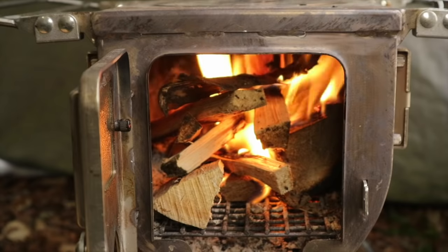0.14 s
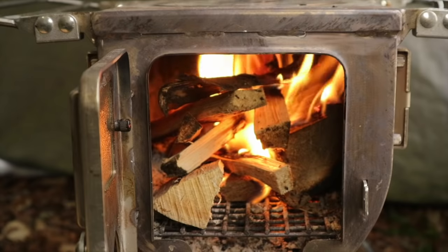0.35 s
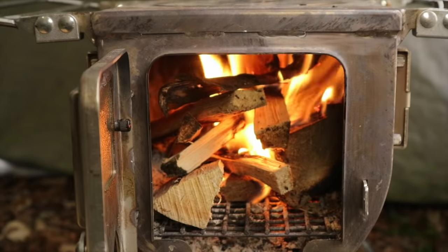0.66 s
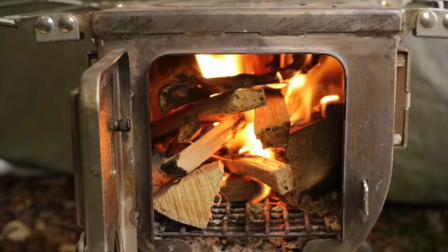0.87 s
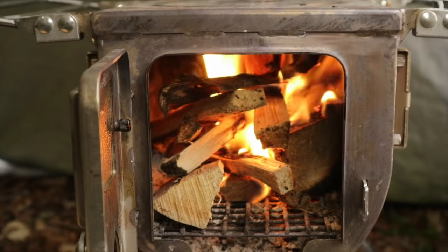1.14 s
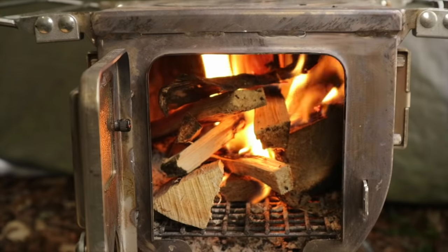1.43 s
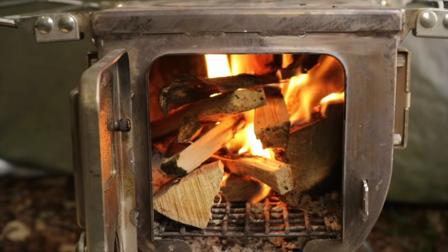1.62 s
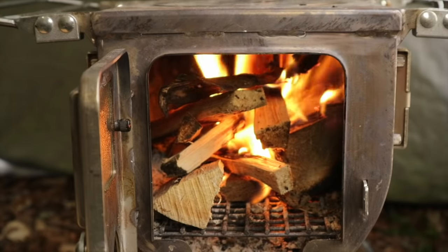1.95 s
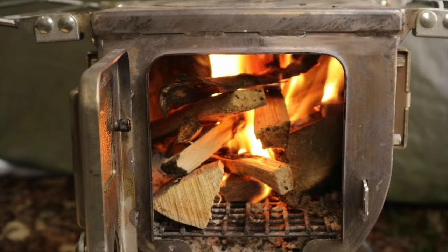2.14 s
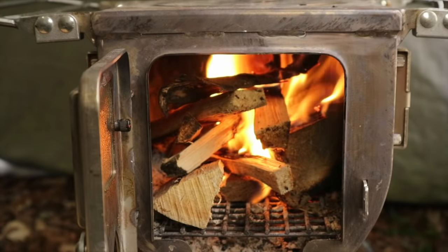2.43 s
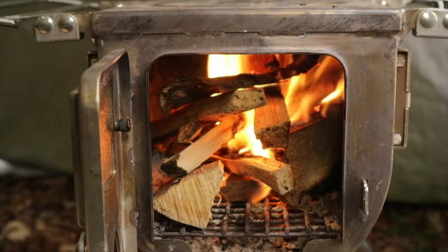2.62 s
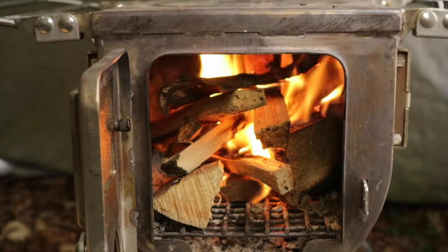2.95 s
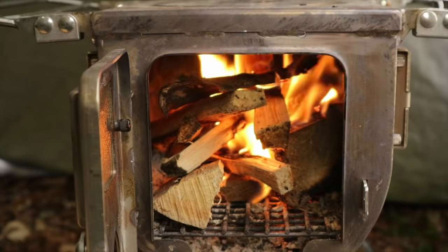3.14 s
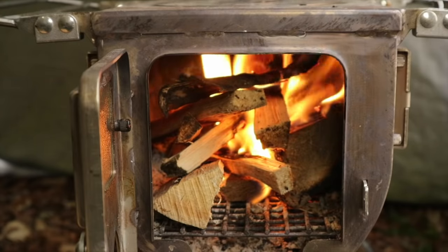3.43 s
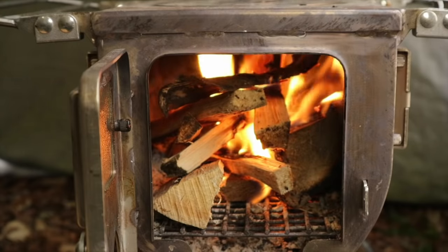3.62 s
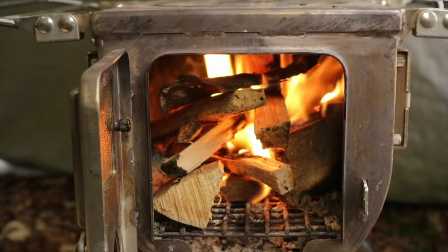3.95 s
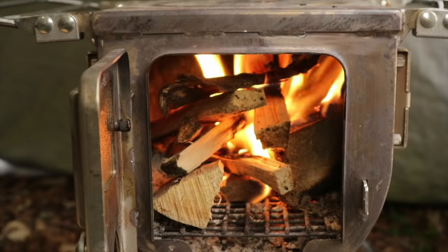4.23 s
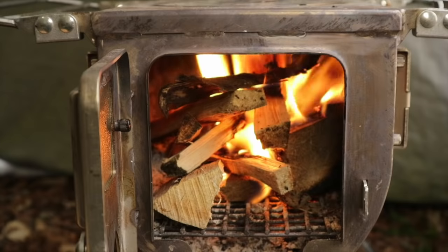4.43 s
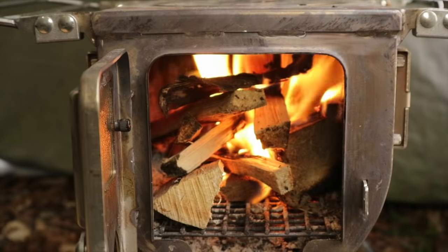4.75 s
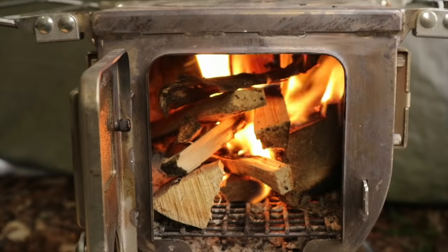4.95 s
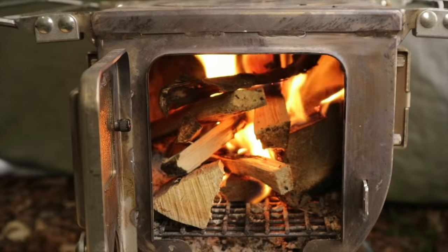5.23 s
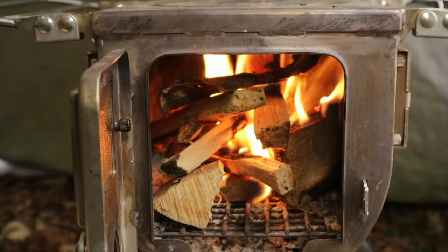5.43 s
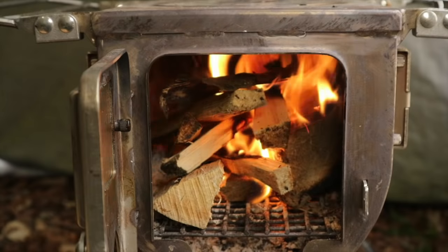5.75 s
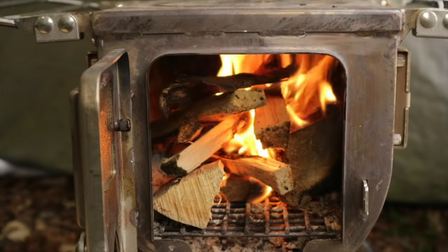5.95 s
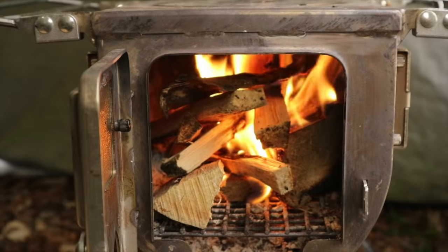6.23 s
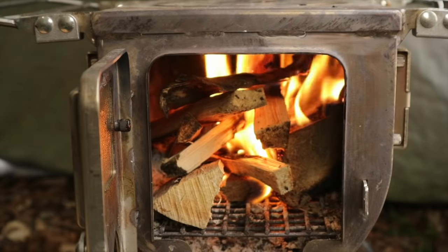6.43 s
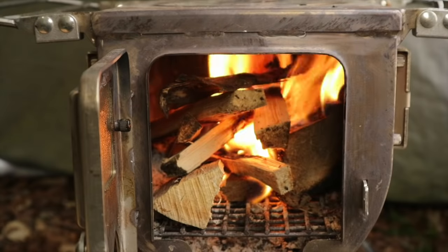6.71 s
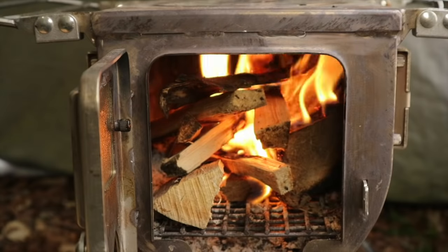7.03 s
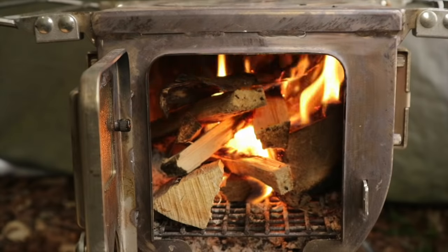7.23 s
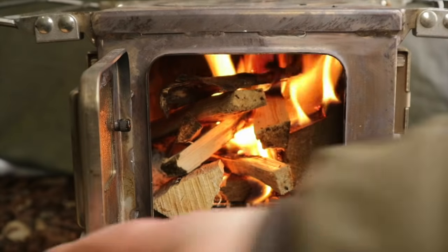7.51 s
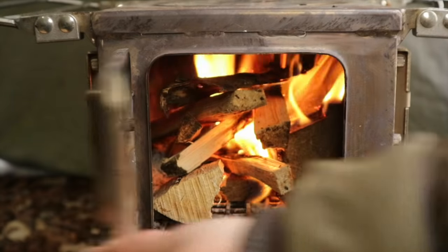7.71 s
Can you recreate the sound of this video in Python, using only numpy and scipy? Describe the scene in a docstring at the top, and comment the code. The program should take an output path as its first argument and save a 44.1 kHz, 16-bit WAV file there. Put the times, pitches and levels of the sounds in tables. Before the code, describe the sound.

Close wood fire in an open steel stove with sharp boxy pops, a shrill bird alarm outside, then cloth rustle and small door knocks.

```python
"""Logs burn in an open steel tent stove: flames rumble, sap fizzes and ticks, and pops excite the firebox modes.
Fire is shaped noise and minimum-phase clicks; birds outside among the trees are frequency-modulated tones.
A small bird calls thinly, and a larger one gives a shrill alarm rattle of breaking whistles and low clucks.
At the end a sleeve rustles past in grainy noise and the hand starts to swing the stove door shut,
heard as rubs and as knocks of hand, handle and hinge. Faint, wide air in the trees lies under it all."""
import sys
import numpy as np
from scipy import signal
from scipy.fft import rfft, irfft, next_fast_len
from scipy.io import wavfile
from scipy.ndimage import map_coordinates

SR = 44100
rng = np.random.default_rng(int(sys.argv[2]) if len(sys.argv) > 2 else 0)


def wav_record(signal):
    """Record a signal, one row per channel, as 16-bit PCM in the file named by sys.argv[1]."""
    frames = np.transpose(np.atleast_2d(signal))
    bounded = np.clip(frames, -1, 1)
    # unit amplitude maps onto the largest positive 16-bit level
    quanta = np.round(bounded * 32767).astype(np.int16)
    wavfile.write(sys.argv[1], SR, quanta)


N = 347067

# Levels in all tables are relative: normalisation or the settings in scene() place each layer.


def amp(db):
    """Decibel law: level to amplitude ratio."""
    return 10 ** (np.asarray(db) / 20)


def unit(x):
    """Power normalisation: scale to an rms of 1."""
    return x / np.sqrt(np.mean(x ** 2) + 1e-20)


def along(points, hz):
    """Logarithmic frequency scale: interpolate (frequency [Hz], value) points."""
    point_hz, values = np.transpose(points)
    return np.interp(np.log(hz + 1), np.log(point_hz + 1), values)


def curves(rows):
    """Piecewise-linear envelopes: one value per sample for each column after the time."""
    times, *columns = np.transpose(rows)
    return [np.interp(np.arange(N) / SR, times, column) for column in columns]


def wobble(rate, size=N):
    """Band-limited random modulation: a smooth curve through rate random knots a second."""
    knots = rng.standard_normal(int(size * rate / SR) + 4)
    return map_coordinates(knots, [np.arange(size) * rate / SR])


def add(track, s, x):
    """Superposition: mix x into the track from time s [s]."""
    part = track[round(s * SR):][:len(x)]
    part += x[:len(part)]


def noise(spectrum, size=N):
    """Spectral shaping: coloured Gaussian noise of rms 1."""
    m = next_fast_len(size)
    gain = amp(along(spectrum, np.fft.rfftfreq(m, 1 / SR)))
    return unit(irfft(rfft(rng.standard_normal(m)) * gain, m)[:size])


def causal(gain_db, size=2048):
    """Minimum phase: the sharpest causal click with this gain (a function of Hz), of energy 1."""
    cepstrum = irfft(np.log(amp(gain_db(np.fft.rfftfreq(size, 1 / SR))) + 1e-6))
    # folding the cepstrum onto positive times makes the phase minimal
    cepstrum[1:size // 2] *= 2
    cepstrum[size // 2 + 1:] = 0
    click = irfft(np.exp(rfft(cepstrum)))
    return click / np.linalg.norm(click)


def tail(t60, size):
    """Diffuse reverberation: echoes of energy 1 in which each frequency has its own decay time."""
    hz, t, z = signal.stft(rng.standard_normal(size), SR, nperseg=256)
    decay_s = np.maximum(along(t60, hz), .01)[:, None]
    x = signal.istft(z * amp(-60 * t / decay_s), SR, nperseg=256)[1][:size]
    return x / np.linalg.norm(x)


# air moving in the trees all around: (frequency [Hz], density [dB per Hz])
AIR_SPECTRUM = [(15, -47), (25, -13.5), (69, -13), (164, -1.5), (349, 1), (482, 0), (537, 1), (1410, -9.5),
                (15500, -15.5)]


def air(level_db):
    """Incoherence: two independent noises make the air in the trees wide."""
    return amp(level_db) * np.array([noise(AIR_SPECTRUM), noise(AIR_SPECTRUM)])


# pull of the draught through the stove: (time [s], level [dB])
DRAUGHT_PULL = [(0.0, -63.5), (0.57, -70), (0.75, -64.5), (1.69, -67.5), (2.57, -56), (2.89, -61),
                (4.19, -55.5), (4.5, -63.5), (6.6, -66)]
# roar of the flames: (frequency [Hz], density [dB per Hz])
FLAME_SPECTRUM = [(20, -36.5), (40, -23), (80, -6.5), (125, -6.5), (165, 1), (250, -2), (400, -4.5),
                  (700, -7), (1100, -10.5), (2000, -20), (5000, -36)]
# draught sounding the firebox: (frequency [Hz], density [dB per Hz])
DRAUGHT_SPECTRUM = [(200, -25), (480, -11), (565, 1.5), (630, 2.5), (720, -4), (850, -10.5), (1300, -22.5),
                    (2500, -37)]
# fizz of sap: (frequency [Hz], density [dB per Hz])
FIZZ_SPECTRUM = [(800, 2), (2000, -1.5), (3500, -2.5), (5500, -6), (7500, -1), (10000, -7), (13000, -2),
                 (16000, -5.5)]
FLAME_FOLLOWS = 0.14  # dB of flame roar per dB of draught


def flames(flame_db, draught_db, fizz_db):
    """Modulated turbulence noise: flames flutter and grow with the draught, over a nearly steady fizz of sap."""
    pull, = curves(DRAUGHT_PULL)
    flutter = wobble(14)
    flame_level = flame_db + FLAME_FOLLOWS * (pull - pull.mean()) + 0.68 * flutter + 0.77 * wobble(40)
    roar = amp(flame_level) * noise(FLAME_SPECTRUM)
    hollow = amp(pull + draught_db + 1.4 * flutter) * noise(DRAUGHT_SPECTRUM)
    fizz = amp(fizz_db + 0.22 * wobble(6) + 1.1 * wobble(300)) * noise(FIZZ_SPECTRUM)
    return roar + hollow + fizz


def tearing(t60, size=400):
    """Phase dispersion: fibres tear over a short time, so a snap is smeared but keeps its colour."""
    tear = rng.standard_normal(size) * amp(-60 * np.arange(size) / SR / t60)
    # the inverse of its own spectrum flattens the smear
    even = causal(lambda hz: -20 * np.log10(abs(rfft(tear, 2 * len(hz) - 2)) + 1e-9))
    tear = np.convolve(tear, even)[:size]
    return tear / np.linalg.norm(tear)


# reverberation of the firebox: (frequency [Hz], decay time T60 [s])
BOX_DECAY = [(200, 0.2), (1000, 0.077), (4000, 0.11), (15000, 0.089)]


def in_stove(x, wall_s=0.001393, wall_db=-4, tail_db=-5, size=6000):
    """Early reflection and reverberation: the back wall echoes a sound at once, then the whole box."""
    onset = np.minimum(np.arange(size) / SR / .002, 1)
    echoes = amp(tail_db) * tail(BOX_DECAY, size) * onset
    echoes[0] += 1  # direct sound
    add(echoes, wall_s, np.array([amp(wall_db)]))
    return signal.fftconvolve(x, echoes)


# the clearest ticks of bark and embers: (time [s], level [dB], peak frequency [Hz])
CLEAR_TICKS = [(0.293, -37, 6870), (0.4324, -36, 7530), (0.621, -41, 6850), (0.9378, -36.5, 2260),
               (1.2556, -41, 6500), (1.3375, -30.5, 2060), (1.578, -32.5, 8140), (1.8221, -39.5, 3480),
               (2.6723, -40, 12600), (2.7492, -34, 15100), (2.7894, -35.5, 4580), (3.2428, -38, 2300),
               (3.328, -36, 8340), (3.4679, -39, 2500), (5.2732, -36, 2340), (6.07, -27.5, 11050),
               (6.224, -35, 2470), (6.2911, -45, 12900), (6.7371, -39, 7450)]
# bright crack of tearing wood: (frequency [Hz], gain [dB])
CRACK_SPECTRUM = [(100, -47), (400, -22), (1500, -5.5), (2700, -5), (4000, -6.5), (6000, -3), (8000, -2.5),
                  (10000, -4.5), (12500, 1.5), (16000, -10.5)]


def embers(clear_db, tick_db, scatter_db, limit_db, count=400):
    """Impulsive emission: a few clear ticks and many tiny ones of random size, each with its own pitch."""
    when, size, pitch = rng.random((count, 3)).T
    tiny_db = tick_db + np.minimum(-scatter_db * np.log(size + 1e-9), limit_db)
    tiny = zip(when * (N - 1) / SR, tiny_db, 2200 * 6.5 ** pitch)
    clear = [(s, db + clear_db, hz) for s, db, hz in CLEAR_TICKS]
    out = np.zeros(N)
    for s, db, tick_hz in [*clear, *tiny]:
        click = causal(lambda hz: along(CRACK_SPECTRUM, hz) + 10 / (1 + ((hz - tick_hz) / 1300) ** 2), size=128)
        add(out, s, amp(db) * np.convolve(click, tearing(t60=0.0019, size=100)))
    return in_stove(out)[:N]


# air modes of the firebox: (frequency [Hz], level [dB], decay time T60 [s])
FIREBOX_MODES = [(107, -12.5, 0.18), (179.6, -4.5, 0.117), (202.2, -1, 0.19), (246, -4.5, 0.18),
                 (565, 0.5, 0.15), (628, 3, 0.11), (699, 1, 0.057), (761.6, -22, 0.31), (836, -15.5, 0.059),
                 (1040, -22, 0.05), (1230, -14.5, 0.082)]


def firebox(scatter_db, size=11025):
    """Modal resonance: the place of the blow decides how strongly each air mode of the box answers."""
    t = np.arange(size) / SR
    ring = np.zeros(size)
    for hz, db, t60 in FIREBOX_MODES:
        level = db + scatter_db * rng.standard_normal() - 60 * t / t60
        ring += amp(level) * np.sin(2 * np.pi * hz * t + rng.uniform(-0.88, 1))
    ring *= 1 - np.exp(-t / 0.00058)  # soft onset
    # low cut: the boom is thinned below 110 Hz
    ring = signal.sosfilt(signal.butter(2, 110, "high", fs=SR, output="sos"), ring)
    return ring / np.linalg.norm(ring)


# wood splitting: (time before lag [s], crack level [dB], boom over crack [dB], knock over crack [dB],
# splinter frequency [Hz], ring of the log [Hz])
WOOD_POPS = [(0.4994, -13.5, -24, -16, 5000, 1000), (0.7099, -26, -36, -21.5, 7160, 1400),
             (2.9394, -18, -32, -33, 13800, 750), (4.7421, -30, -18.5, -13, 5240, 1100),
             (5.6314, -45.5, 1.5, -15.5, 6940, 650), (5.6998, -12.5, -10.5, -14, 5300, 600),
             (5.8728, -37.5, 5, -2.5, 7660, 750), (5.9187, -21.5, -30.5, -22, 12500, 1400),
             (6.2554, -52, 4, -3.5, 13700, 650), (6.6203, -32, -30, -17, 7500, 2800),
             (6.6319, -5.5, -26, -23.5, 7920, 720), (6.895, -15.5, -17, -12, 14400, 850),
             (7.1272, -17.5, -9.5, -13, 7580, 650)]
# knock of the log: (frequency [Hz], gain [dB])
KNOCK_SPECTRUM = [(30, -25), (60, -12.5), (100, -12), (220, -2.5), (400, -8), (750, 6), (1100, 3),
                  (1800, -4.5), (2700, 2), (3600, -7), (6000, -12.5), (16000, -32.5)]
SPLINTER_WIDTH_HZ = 800
LOG_RING_DB, LOG_RING_WIDTH = 5.5, .22  # height of the log's resonance; its width as a share of its pitch


def pops(crack_db, knock_db, boom_db, splinter_db, lag_s):
    """Impulse excitation: steam bursts the wood in a bright crack, the knock of the log and the boom of the box."""
    out = np.zeros(N)
    for s, db, boom, knock, splinter_hz, log_hz in WOOD_POPS:
        def crack_gain(hz):
            peak = 1 + ((hz - splinter_hz) / SPLINTER_WIDTH_HZ) ** 2
            return along(CRACK_SPECTRUM, hz) + splinter_db / peak

        def knock_gain(hz):
            peak = 1 + ((hz / log_hz - 1) / LOG_RING_WIDTH) ** 2
            return along(KNOCK_SPECTRUM, hz) + LOG_RING_DB / peak

        click = amp(crack_db) * signal.fftconvolve(causal(crack_gain), tearing(t60=0.0058))
        # the log bends, so its knock comes out spread in time: an all-pass filter
        thud = signal.lfilter([.8, -1.75, 1], [1, -1.75, .8], causal(knock_gain))
        add(click, 0, amp(knock + knock_db) * thud)
        add(out, s + lag_s, amp(db) * in_stove(click))
        add(out, s + lag_s, amp(db + boom + boom_db) * firebox(scatter_db=4.5))
    return out


ATTACK_S, RELEASE_S = .0025, .006  # of every bird note


def gate(t):
    """Amplitude envelope: attack, hold and release of a bird's note over its times t."""
    return np.clip(t / ATTACK_S, 0, 1) * np.clip((t[-1] - t) / RELEASE_S, 0, 1)


# calls of the small bird: (time [s], length [s], mid pitch [Hz], swing either way [Hz],
# quaver period [s], level [dB])
SMALL_BIRD_CALLS = [(0.087, .15, 7060, 170, .055, -56.5), (5.89, 0.048, 7550, 650, .027, -58),
                    (6.549, .058, 7400, 650, 0.022, -57.5)]


def thin_calls(level_db, trough_db):
    """Frequency modulation: a high whistle quavers up and down, on average loudest at the bottom of each swing."""
    out = np.zeros(N)
    for s, length, pitch_hz, swing_hz, period, db in SMALL_BIRD_CALLS:
        t = np.arange(round(length * SR)) / SR
        low = np.cos(2 * np.pi * t / period)  # 1 at the bottom of a swing
        hz = (pitch_hz - swing_hz * low) * (1 + .018 * wobble(400, len(t)))
        level = db + level_db + trough_db * low + 2.4 * wobble(152.6, len(t))
        add(out, s, gate(t) * amp(level) * np.sin(2 * np.pi * np.cumsum(hz) / SR))
    return out


# reverberation of the far trees: (frequency [Hz], decay time T60 [s])
WOODS_DECAY = [(1000, 0.98), (2500, 0.66), (5000, 0.58), (12000, 0.86)]


def woods(x, near_db, far_db):
    """Multiple scattering: nearby trunks and the tent smear a call; the trees beyond let it linger."""
    near = tail([(1000, 0.035)], size=6000)
    far = tail(WOODS_DECAY, size=30000)
    smeared = amp(near_db) * signal.fftconvolve(x, near)[:N]
    lingering = amp(far_db) * signal.fftconvolve(x, far)[:N]
    return x + smeared + lingering


def syrinx(hz, jitter, second=0):
    """Two-voice phonation: a jittering whistle with weak overtones; the other side may add a lower tone."""
    n = len(hz)
    unsteady_hz = hz * (1 + jitter * wobble(1100, n) + 0.013 * wobble(111.4, n))
    phase = 2 * np.pi * np.cumsum(unsteady_hz) / SR
    overtones = amp(-27.0) * np.sin(2 * phase) + amp(-29.5) * np.sin(3 * phase)
    voice = np.sin(phase) + second * np.sin(.77 * phase) + overtones
    return amp(2.8 * wobble(357, n)) * voice


# low clucks that open and close the rattle: (time [s], length [s], starting pitch [Hz], level [dB],
# pitch jitter [share])
RATTLE_CLUCKS = [(3.676, 0.041, 2200, -49, .14), (3.741, 0.0537, 3400, -41, .07),
                 (3.757, .046, 2200, -45, .12), (4.834, .037, 2626, -45, 0.0465),
                 (4.892, 0.0622, 2537, -46, 0.025), (4.992, 0.08, 2400, -46.5, .04),
                 (5.039, 0.0755, 2820, -41, 0.102), (5.17, 0.05, 2317, -52, .14),
                 (5.23, 0.053, 2355, -49.5, 0.14), (5.288, 0.049, 2300, -52.5, 0.14),
                 (5.337, .054, 2250, -50, 0.15), (5.393, 0.0346, 2320, -47.5, .08),
                 (5.495, 0.042, 2037, -53.5, 0.153)]
# harsh breath of the screech: (frequency [Hz], density [dB per Hz])
SCREECH_SPECTRUM = [(1500, -34), (2700, -32), (3400, -8), (4100, 1), (5000, -4.5), (5900, -3.5),
                    (7000, -14.5), (8500, -23), (10000, -23), (13000, -30), (16000, -39)]
CLUCK_FADE_DB, CLUCK_SAG = 7.5, .06  # level and share of the pitch lost by the end of a cluck
CLUCK_SWELL_S = 0.0065  # a cluck starts more softly than a shriek


def clucks(level_db, screech_db):
    """Pitch glide: low, hoarse notes sag a little and carry only a trace of the screech."""
    out = np.zeros(N)
    for s, length, pitch_hz, db, jitter in RATTLE_CLUCKS:
        t = np.arange(round(length * SR)) / SR
        spent = (t / length) ** 2
        voice = syrinx(pitch_hz * (1 - CLUCK_SAG * spent), jitter)
        voice = voice + amp(screech_db) * noise(SCREECH_SPECTRUM, len(t))
        swell = 1 - np.exp(-t / CLUCK_SWELL_S)
        add(out, s, gate(t) * swell * amp(db + level_db - CLUCK_FADE_DB * spent) * voice)
    return out


# shrieks of the alarm rattle: (time [s], held pitch [Hz], whistle level [dB], screech level [dB],
# pitch lost in the fall [share])
ALARM_SHRIEKS = [(3.805, 4175, -35.5, -31, .38), (3.891, 4120, -38.5, -29.5, .42),
                 (3.978, 4180, -36.5, -32, .42), (4.061, 4231, -33, -33, .42),
                 (4.134, 4250, -38, -34.5, .46), (4.218, 4330, -36.5, -34, .5),
                 (4.301, 4380, -35.5, -34.5, .45), (4.386, 4276, -31.5, -30.5, .52),
                 (4.475, 4220, -34.5, -33.5, .42), (4.558, 4030, -39, -32.5, .48),
                 (4.639, 4370, -33.5, -33.5, .5), (4.727, 4076, -38, -33.5, .45),
                 (4.816, 3850, -40, -43, .36), (4.888, 3883, -42, -40.5, .15),
                 (4.978, 3910, -43.5, -46, .08)]
SHRIEK_S, TIRES_AT_S, LENGTHENS = .055, 4.76, .09  # length; once the bird tires it gains this many s per s
SCOOP, SCOOP_S = 0.0816, 0.00404  # the pitch starts this share low and slides up
SCREECH_AT, SCREECH_RISE_DB, SCREECH_FALL_DB = .57, 33, 18.5  # progress at its peak; slopes per unit progress
BREAK_AT, FALL_FADE_DB = .43, 13  # progress at the end of the hold; dB lost in the fall after that
# pitch jitter of the whistle; added at the height of the screech; added by the fall
HOARSE_HELD, HOARSE_BROKEN, HOARSE_FALLEN = .016, .045, .06


def shrieks(whistle_db, screech_db, second_db):
    """Tone-to-noise transition: a held whistle breaks into a screech and falls away hoarsely."""
    out = np.zeros(N)
    for s, pitch_hz, whistle, screech, fall in ALARM_SHRIEKS:
        length = SHRIEK_S + LENGTHENS * max(s - TIRES_AT_S, 0)
        t = np.arange(round(length * SR)) / SR
        # each note breaks a little early or late
        progress = (t / length) ** np.exp(0.099 * rng.standard_normal())
        fallen = np.sin(np.pi / 2 * np.clip((progress - BREAK_AT) / (1 - BREAK_AT), 0, 1)) ** 2
        hz = pitch_hz * (1 - SCOOP * np.exp(-t / SCOOP_S) - fall * fallen)
        second = amp(second_db) * np.exp(-((progress - .33) / 0.11) ** 2)
        past_peak = progress - SCREECH_AT
        harsh_db = -np.maximum(-SCREECH_RISE_DB * past_peak, SCREECH_FALL_DB * past_peak)
        jitter = HOARSE_HELD + HOARSE_BROKEN * amp(harsh_db) + HOARSE_FALLEN * fallen
        voice = syrinx(hz, jitter, second)
        add(out, s, gate(t) * amp(whistle + whistle_db - FALL_FADE_DB * fallen) * voice)
        level = screech + screech_db + harsh_db + 1.56 * wobble(605, len(t))
        add(out, s, gate(t) * amp(level) * noise(SCREECH_SPECTRUM, len(t)))
    return out


# the sleeve sliding, louder as the arm moves faster: (time [s], level [dB])
ARM_SLIDE = [(6.76, -66), (6.795, -51.5), (6.88, -49.5), (7.06, -49), (7.25, -47), (7.41, -41.5),
             (7.58, -45), (7.73, -55.5), (7.87, -46.5)]
# cloth of the sleeve: (frequency [Hz], density [dB per Hz])
SLEEVE_SPECTRUM = [(59, -44), (100, -16), (202, -8), (335, -10.5), (365, -5), (621, -5.5), (818, -4),
                   (1280, -4), (1680, -4), (11900, -16), (16000, -24)]


def sleeve(level_db):
    """Friction noise: cloth slides in fine grains."""
    slide, = curves(ARM_SLIDE)
    moving = np.arange(N) / SR > ARM_SLIDE[0][0]
    grains = amp(0.92 * wobble(35) + 1.1 * wobble(700))
    return moving * amp(slide + level_db) * unit(noise(SLEEVE_SPECTRUM) * grains)


SNAGS_PER_S = 260


def snags(level_db, scatter_db):
    """Stick-slip: threads of the sleeve catch and let go in tiny ticks, the louder the faster it slides."""
    slide, = curves(ARM_SLIDE)
    moving = np.arange(N) / SR > ARM_SLIDE[0][0]
    slips = (rng.random(N) < SNAGS_PER_S / SR) * amp(scatter_db * rng.standard_normal(N))
    spectrum = [(500, -24), (2000, -3), (3800, -2), (6000, -8), (16000, -22)]
    tick = np.convolve(causal(lambda hz: along(spectrum, hz), size=256), tearing(t60=0.0055))
    return moving * amp(slide + level_db) * unit(signal.fftconvolve(slips, tick)[:N])


# knocks of hand, handle and hinge: (time [s], level [dB], centre frequency [Hz])
REACH_KNOCKS = [(6.789, -37.5, 660), (7.272, -39, 442), (7.308, -41, 3800), (7.363, -38, 210),
                (7.524, -36.5, 424), (7.582, -38.5, 1910), (7.638, -33, 1400), (7.845, -27, 620)]


def reach_knocks(level_db):
    """Damped impact: each knock of hand, handle or hinge is a decaying band of noise."""
    out = np.zeros(N)
    t = np.arange(SR // 10) / SR
    for s, db, hz in REACH_KNOCKS:
        spectrum = [(hz / 3, -28), (hz / 1.36, -5), (hz, 0), (hz * 1.18, -5), (hz * 3, -20), (hz * 9, -42)]
        add(out, s, amp(db + level_db) * noise(spectrum, len(t)) * amp(-60 * t / 0.053))
    return out


# hand and door rubbing on the stove: (time of the peak [s], half width at 1/e [s], level [dB])
REACH_RUBS = [(6.793, 0.0133, -49.5), (7.2, .035, -50), (7.4, .035, -44), (7.705, 0.016, -44),
              (7.875, .045, -38.5)]


def rubs(level_db):
    """Friction-driven resonance: each rub swells and fades, sounding the firebox."""
    clock = np.arange(N) / SR
    scrape = noise([(30, -30), (100, -1), (170, 2), (330, 2.0), (700, 2.5), (3000, -10)])
    pressure = sum(amp(db + level_db) * np.exp(-((clock - s) / width) ** 2) for s, width, db in REACH_RUBS)
    return pressure * unit(signal.fftconvolve(scrape, firebox(scatter_db=1.0))[:N])


def scene():
    """Superposition: stove, birds and arm stand straight ahead; only the faint outdoor air is wide."""
    fire = flames(flame_db=-60, draught_db=0, fizz_db=-62.0)
    fire = fire + embers(clear_db=4, tick_db=-47.5, scatter_db=4.5, limit_db=11.0)
    fire = fire + pops(crack_db=4.5, knock_db=21.5, boom_db=23.0, splinter_db=6.5, lag_s=.0008)
    birds = thin_calls(level_db=-2.0, trough_db=2) + clucks(level_db=3.5, screech_db=-20)
    birds = birds + shrieks(whistle_db=1.2, screech_db=-3.3, second_db=-6)
    reach = sleeve(level_db=0.5) + snags(level_db=-8.5, scatter_db=4)
    reach = reach + reach_knocks(level_db=-3.0) + rubs(level_db=0)
    front = fire + woods(birds, near_db=-9, far_db=-3.2) + reach
    return front + air(level_db=-61.5)


LOW_CUT_HZ, TOP_HZ = 44, 16100


def record(dry):
    """Band limiting: the microphone thins the deep bass, and nothing passes above the top frequency."""
    thinned = signal.sosfilt(signal.butter(2, LOW_CUT_HZ, "high", fs=SR, output="sos"), dry)
    m = next_fast_len(N + SR // 2)
    passed = np.fft.rfftfreq(m, 1 / SR) < TOP_HZ
    return irfft(rfft(thinned, m) * passed, m)[:, :N]


dry = scene()
out = record(dry)
wav_record(out)
```